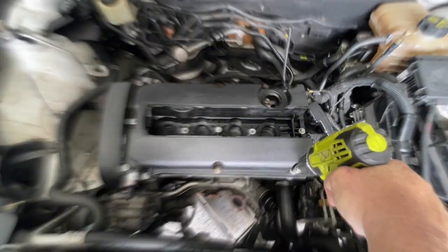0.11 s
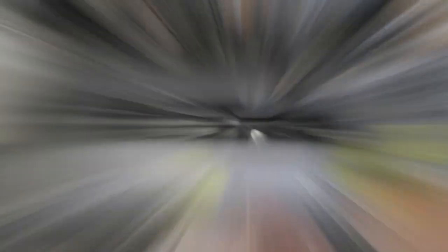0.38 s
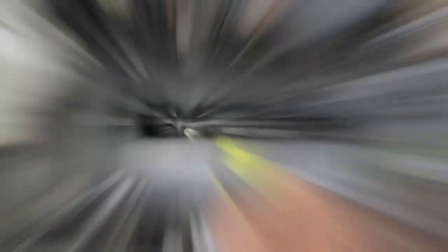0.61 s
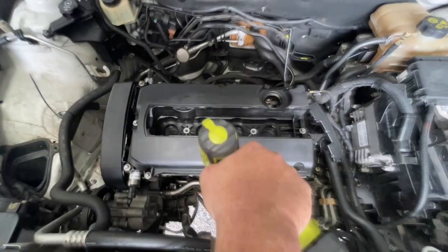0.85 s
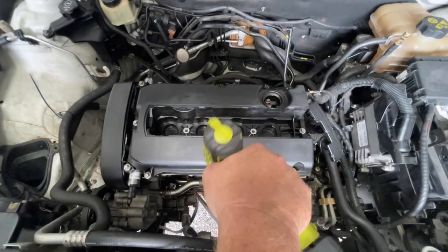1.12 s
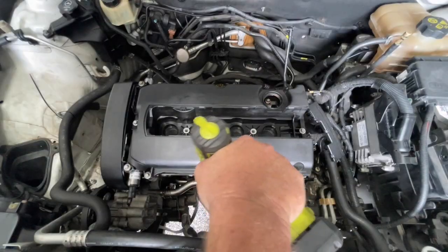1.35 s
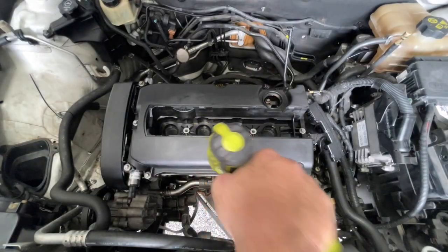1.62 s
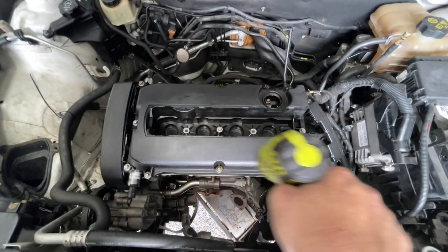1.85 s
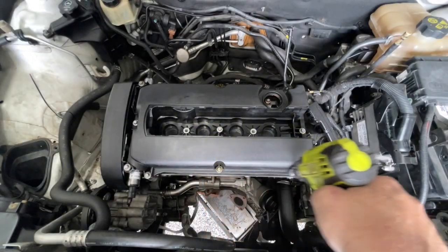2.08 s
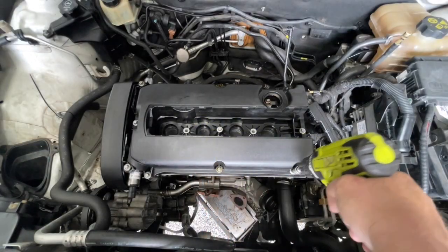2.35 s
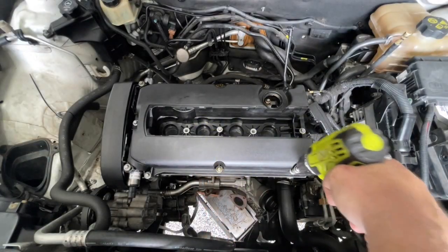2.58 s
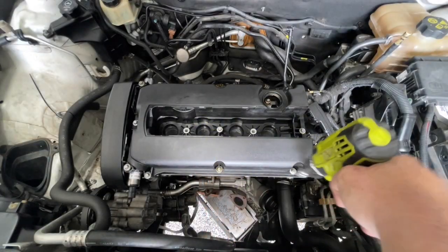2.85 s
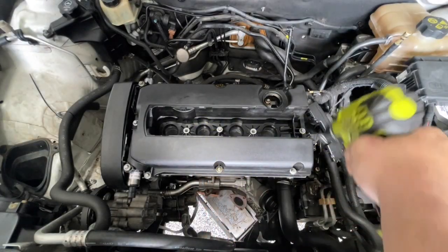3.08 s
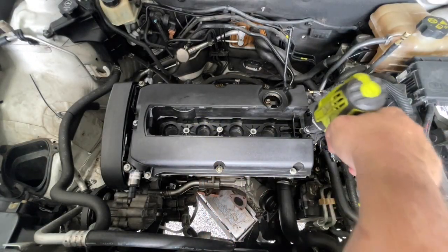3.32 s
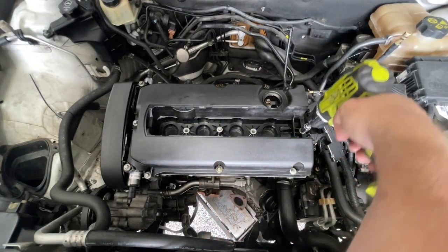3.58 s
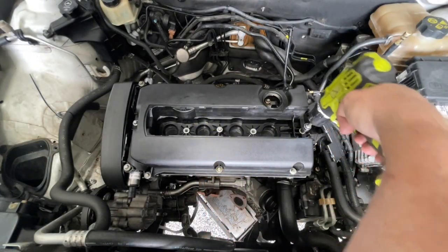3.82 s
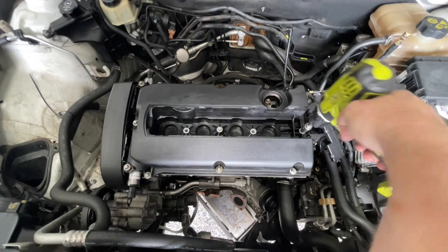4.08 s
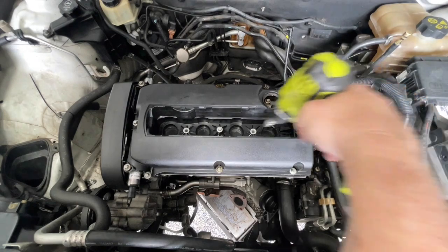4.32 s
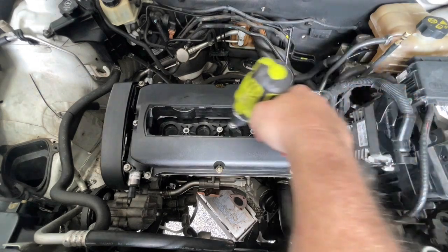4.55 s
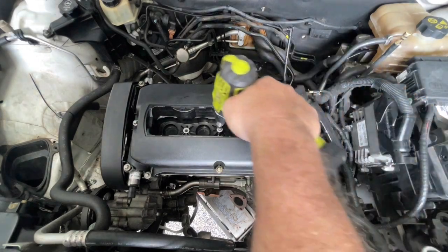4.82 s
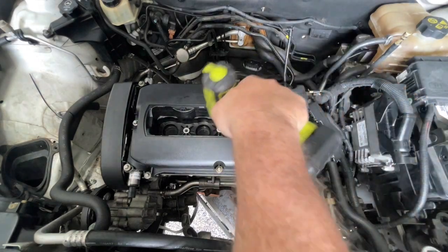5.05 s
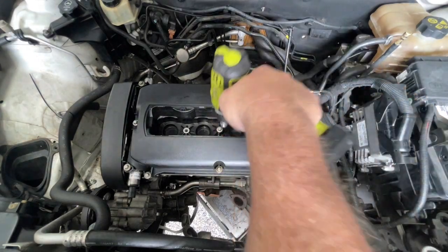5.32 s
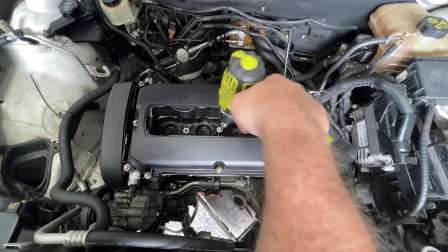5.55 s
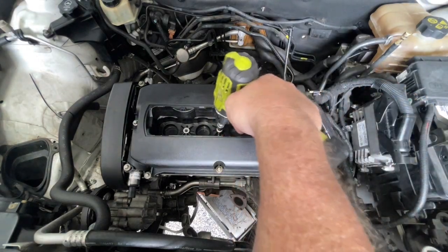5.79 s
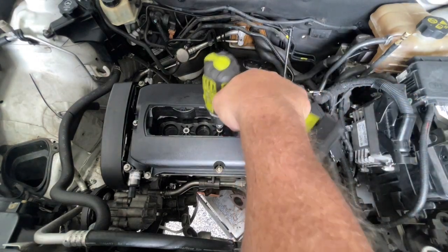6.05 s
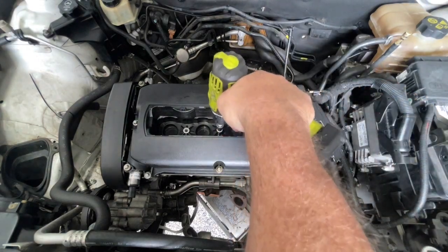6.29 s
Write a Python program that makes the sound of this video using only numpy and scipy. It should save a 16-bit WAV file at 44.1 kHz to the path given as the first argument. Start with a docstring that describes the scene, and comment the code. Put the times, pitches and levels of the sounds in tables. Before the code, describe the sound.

Close up in a large, reverberant workshop, a cordless impact driver already running winds down and stops. Four short trigger pulls follow, each a quick rising whine that bites into harsh, rapid hammering, ringing a hollow engine cover. In the gaps the socket ticks on bolt heads and the tool knocks the cover. A low rumble continues beneath, in stereo.

```python
"""A whining, whirring motor slows to a stop: a cordless impact driver in a large workshop.
Four more pulls of the trigger run bolts down on an engine cover. The whine is a stack of sine waves, the whir is noise.
Once a bolt bites, the hammer strikes about sixty times a second; each blow rings the cover's modes.
Between runs the socket clicks on bolt heads and the tool knocks on the cover: noise bursts and ringing modes.
Close echoes and a ringing hall surround the tool, over a low rumble of coloured noise."""
import sys
import numpy as np
from scipy import signal
from scipy.fft import rfft, irfft, next_fast_len
from scipy.io import wavfile

SR = 44100
rng = np.random.default_rng(int(sys.argv[2]) if len(sys.argv) > 2 else 0)


def to_wav(s):
    """Save 16-bit WAV."""
    ch = np.atleast_2d(s).T  # columns
    pcm = np.round(np.clip(ch, -1, 1) * 32767)  # PCM
    wavfile.write(sys.argv[1], SR, pcm.astype(np.int16))


def invert_db(x):
    """Field ratio 10**(x/20) for x, a level in decibels (scalar or array-like)."""
    u = np.asarray(x, float) / 20
    return 10 ** u


N = 283122   # length in samples
TIME_S = np.arange(N) / SR
HZ = np.arange(N // 2 + 1) * SR / N + 1e-3   # pitch of each spectrum bin, kept above zero for the logarithm

# A run already under way slows to a stop: start_s, rotor_hz, whine_db, whir_db
RUN_DOWN = [(0, 306.2, -33, -27), (.48, 305.3, -40.5, -32.5), (.58, 273.7, -48.5, -35.5),
            (.67, 234, -56, -39.5), (.765, 199, -64.5, -49.5)]
# The hammer still slips while the tool coasts: start_s, blows_per_s, boom_db, favoured_hz, favour_db
SLIPPING = [(.592, 54, -38, 705, 2), (.76, 39, -49.5, 714, 6)]
# Pulls of the trigger: trigger_s, bite_s (the bolt bites), stop_s, whir_lost_under_load_db
PULLS = [(1.051, 1.179, 1.52, 1.5), (2.396, 2.448, 2.772, 4), (3.579, 3.692, 4.015, 1.5),
         (5.852, 5.992, 6.353, 1.5)]
# Free spin of each pull: top_rotor_hz, whine_db, once_a_turn_hum_lift_db
SPINS = [(270, -42, 9), (262, -50, 4), (252, -31, -10), (272, -38, 9)]
# Hammering pace of each pull: first_blows_per_s, full_blows_per_s, last_blows_per_s, flagging_start_s
PACES = [(59.5, 62.6, 45, 1.43), (55, 63.3, 46, 2.7), (58, 61, 51.5, 3.845), (59.3, 63, 45, 6.293)]
# Hammering bout of each pull: loudest_boom_db, loudest_point_share_of_bout, favoured_hz, favour_db
BOUTS = [(-21, 0.71, 840, 3.5), (-29.5, 0.15, 460, 8.5), (-27, 0.26, 520, 8), (-22, 0.69, 487, 10.5)]
# Whine of the motor: multiple_of_rotor_speed, level_db
WHINE_ORDERS = [(1, -7.5), (2, 1.5), (3, -4.5), (4, 1.5), (5, -8), (6, -10.5), (7.35, -12), (9, -7.5),
                (13, -11), (14, -13.5), (15, -9)]
# Noise colour of gears and fan: pitch_hz, level_db (dB per Hz)
WHIR_COLOUR = [(90, -41), (150, -16), (300, -2), (600, 0), (1200, 1.5), (2500, 0.5), (4000, -4.5),
               (6000, -3.5), (8000, -6)]
# Noise colour of the bright fan hiss and of hard ticks: pitch_hz, level_db (dB per Hz)
FAN_COLOUR = [(5000, -25.5), (8500, -7.5), (11500, -1.5), (15000, -7)]
# Noise colour of hammer on anvil: pitch_hz, level_db (dB per Hz)
CRACK_COLOUR = [(1000, -9.5), (3900, -5.5), (5300, 6.5), (7500, 1), (11000, 0)]
# Ringing modes of the cover: pitch_hz, level_db, decay_by_60_db_s
COVER_MODES = [(140.3, -15, 0.24), (187, -13, 0.062), (391.6, -3, 0.047), (431.7, -0.5, 0.064),
               (494, -3.5, 0.069), (596, -5, 0.098), (679, 0.5, 0.055), (797, -3.5, 0.041),
               (953, -0.5, 0.034), (1060, -2, 0.041), (1194, 1.5, 0.025), (1537, -5.5, 0.039),
               (1720, -7.5, 0.023), (2070, -2, 0.0083)]
# Socket and tool touching metal: start_s, tick_db, thud_db, favoured_thud_hz, bright_top_db
KNOCKS = [(0.5928, -12.5, -43, 880, -29), (0.823, -26, -32, 663, -63), (0.8338, -26.5, -33.5, 635, -62),
          (0.8685, -34.5, -42, 670, -71), (0.928, -26, -37, 524, -77), (1.0267, -30.5, -50, 586, -61),
          (1.0662, -8, -21.5, 804, -28), (1.5461, -31, -28.5, 694, -36), (1.586, -30.5, -36, 638, -52),
          (1.849, -45, -35.5, 640, -61), (1.8972, -58, -45, 718, -73), (2.1418, -18.5, -44, 974, -43),
          (2.147, -11, -37.5, 980, -25.5), (2.164, -29, -36, 421, -47), (2.363, -45, -50.5, 601, -59),
          (2.4154, -5.5, -24, 417, -16.5), (3.284, -9, -37.5, 594, -23), (3.3101, -28, -43, 669, -41),
          (3.3263, -19, -46.5, 711, -34), (3.3355, -13, -36.5, 523, -32), (3.3607, -42, -43.5, 668, -53),
          (3.5896, -19.5, -35.5, 610, -47), (4.2616, -37.5, -60, 1210, -45), (4.695, -23, -35, 487, -29),
          (4.837, -29.5, -46, 1240, -42), (4.898, -45, -50, 1000, -44), (4.9275, -7, -11.5, 790, -29),
          (4.966, -25.5, -36, 1020, -37), (4.9797, -20, -29, 685, -28), (5.0189, -32.5, -31.5, 920, -42),
          (5.2967, -24.5, -41.5, 1160, -21.5), (5.3165, -27.5, -30.5, 924, -26.5),
          (5.442, -24, -46, 1260, -44), (5.4695, -48, -47.5, 1060, -62), (5.625, -18.5, -29.5, 950, -36.5),
          (5.6602, -26.5, -35.5, 494, -47), (5.685, -34.5, -47.5, 968, -41.5),
          (5.8721, -36, -28.5, 633, -43)]
# The switch closing at each pull: tick_db, thud_db, favoured_thud_hz, bright_top_db
TRIGGER_CLICK = (-27, -47, 895, -34)
# Noise colour of steel on steel: pitch_hz, level_db (dB per Hz)
TICK_COLOUR = [(600, -23.5), (1000, -8), (2150, 1.5), (3000, 4.5), (4500, -1.5), (6000, -2), (8000, -12)]
# What the close echoes of the engine bay pick up: pitch_hz, level_db
BAY_COLOUR = [(200, -20), (500, -6), (1500, -4), (5000, -2.5), (9000, -5)]
# Ring of the hall: pitch_hz, decay_by_60_db_s
HALL_DECAY = [(100, 0.66), (500, 0.8), (2000, 1), (6000, 1.08), (12000, 0.24)]
# Noise colour of the rumble: pitch_hz, level_db (dB per Hz)
RUMBLE_COLOUR = [(25, -44), (40, -14.5), (55, -4), (80, -7), (157, -15.5), (300, -22), (1030, -25.5),
                 (2500, -41), (8000, -55), (11500, -47)]
# Overall tone, lifted around 10 kHz and falling away above 12 kHz: pitch_hz, level_db
OVERALL_TONE = [(25, -23.5), (45, -2), (7500, -0.5), (8600, 3), (9600, 7), (11200, 7), (12000, -1.5),
                (12900, -13), (15600, -14), (16200, -63)]
# How much stronger the tilt makes left than right: pitch_hz, level_db
LEFT_OVER_RIGHT = [(200, 0), (800, -0.1), (2000, 1), (3500, 4), (7000, 4.5), (8400, -0.4)]
# How far the right channel is turned ahead in phase: pitch_hz, half_turns
RIGHT_TURN = [(1500, 0), (3000, -.25), (7600, -.2), (8800, 0), (9800, .92), (10400, 1.03), (11800, 2),
              (12700, 2), (13100, 3), (14400, 3), (14800, 4)]

# Rotor: starts at a share of its top speed, climbs, then settles under load
START_SHARE, CLIMB_S, LOADED_HZ, SETTLE_S = .84, .105, 295.3, .07
SPIN_UP_S, BITE_S = .05, .004   # rise of the whir at the trigger and at the bite
WHINE_START_DB, WHINE_LOADED_DB = -18, -9   # added to the whine of the free spin
FLUTTER_DB = 2   # spread of each whine order's own wavering
HOUSING_HZ, HOUSING_WIDTH_HZ, HOUSING_DB = 2000, 60, 22   # the tool's shell sings as an order passes
WHIR_START_DB, WHIR_FREE_DB, WHIR_DB = -38, -27.5, -23   # at the trigger, spinning free, just after the bite
SQUEEZE_S, SQUEEZE_DB = .031, -48   # the gears rustle as the finger takes up the trigger
LET_GO_S, LET_GO_DB, BRAKE_S, BRAKE_DB = .063, -3.5, .018, -29.5   # the trigger eases off, the brake grips
FAN_DB, FAN_RUN_DOWN_DB = -5, 0   # fan hiss against the whir: in the pulls, in the run-down
GATHER_S, FLAG_S = .16, .04   # the pace gathers after the bite and flags as the bolt tightens
BOOM_RISE_DB, BOOM_FALL_DB = 5, 6   # swell and fall of a bout
SHUDDER_S, SHUDDER_DB = .036, -21.5   # its dying shudder
FIRST_BLOW_DB, SLIP_SHAKE_DB = 1, 5   # extra shake from first blows and from slipping blows
CRACK_DB = 3   # steel crack of a blow against the whir
TICK_CREST_DB = 8   # a tick's peak stands above the rms of its grit
JOLT_DB, JOLT_HZ = -55.5, 143   # the tool kicks as it spins up and as it brakes
RUMBLE_DB = -47.5


def rms_one(x):
    """Scale to unit rms."""
    return x / np.sqrt(np.mean(x ** 2) + 1e-20)


def at_hz(points, hz):
    """Read a table of pitches and values on a log-frequency axis."""
    point_hz, value = np.array(points).T
    return np.interp(np.log(hz), np.log(point_hz), value)


def colour(x, spectrum):
    """Filter a sound by a table of pitches and levels."""
    return irfft(rfft(x) * invert_db(at_hz(spectrum, HZ)), N)


def in_time(tables, fade_s):
    """Return a gate that is open inside each table's time span, then every column as a curve."""
    gate = 0
    for rows in tables:
        start, end = rows[0][0], rows[-1][0]
        gate = gate + np.interp(TIME_S, [start - fade_s, start, end, end + fade_s], [0, 1, 1, 0])
    s, *columns = np.concatenate(tables).T
    return [gate] + [np.interp(TIME_S, s, column) for column in columns]


def drift(rate):
    """Slow random curve with a spread of about 1, drawn through this many points per second."""
    knots = rng.standard_normal(int(N / SR * rate) + 2)
    return np.interp(TIME_S * rate, np.arange(len(knots)), knots) * 1.2


def dying(clicks, tau_s):
    """Each click starts an exponential decay."""
    return signal.lfilter([1], [1, -np.exp(-1 / (tau_s * SR))], clicks + 1e-18)


def runs():
    """Each pull spins up, spins free, bites, labours, eases off and brakes."""
    tables = [np.c_[RUN_DOWN, np.zeros(len(RUN_DOWN))]]
    for (trigger, bite, stop, lost_db), (top_hz, whine_db, hum_db) in zip(PULLS, SPINS):
        let_go, brake = stop - LET_GO_S, stop - BRAKE_S
        s = np.sort([trigger, trigger + SPIN_UP_S, trigger + 2 * SPIN_UP_S, bite, bite + BITE_S,
                     bite + SETTLE_S, let_go, brake, stop])
        load = np.clip((s - bite) / SETTLE_S, 0, 1)
        free_hz = top_hz * np.interp(s - trigger, [0, CLIMB_S], [START_SHARE, 1])
        rotor_hz = free_hz + load * (LOADED_HZ - free_hz)
        still_starting = np.clip(1 - (s - trigger) / (2 * SPIN_UP_S), 0, 1)
        whine = whine_db + WHINE_START_DB * still_starting + WHINE_LOADED_DB * load
        tired_db = WHIR_DB - lost_db
        eased_db = tired_db + LET_GO_DB
        spun_up = min(trigger + SPIN_UP_S, bite - BITE_S)
        whir = np.interp(s, [trigger, spun_up, bite, bite + BITE_S, let_go, brake, stop],
                         [WHIR_START_DB, WHIR_FREE_DB, WHIR_FREE_DB, WHIR_DB,
                          tired_db, eased_db, eased_db + BRAKE_DB])
        # the rustle before the trigger has practically no whine
        squeeze = [(trigger - early_s, START_SHARE * top_hz, -99, SQUEEZE_DB, hum_db)
                   for early_s in (SQUEEZE_S, .001)]
        pull = np.transpose([s, rotor_hz, whine, whir, hum_db + 0 * s])
        tables.append(np.r_[squeeze, pull])
    return tables


def housing(hz):
    """Lift in dB near the resonance of the tool's shell."""
    return HOUSING_DB * np.exp(-((hz - HOUSING_HZ) / HOUSING_WIDTH_HZ) ** 2)


def motor(shake):
    """Unsteady whine at multiples of rotor speed; noise throbs once a turn and at blows, which also crack."""
    on, rotor_hz, whine_db, whir_db, hum_db = in_time(runs(), fade_s=.004)
    phase = 2 * np.pi * np.cumsum(rotor_hz * (1 + .0012 * drift(60))) / SR
    whine = np.zeros(N)
    for order, db in WHINE_ORDERS:
        level_db = db + FLUTTER_DB * drift(45) + hum_db * (order == 1) + housing(order * rotor_hz)
        whine += invert_db(level_db) * np.sin(order * phase + rng.uniform(0, 2 * np.pi))
    once_a_turn = 1 + 0.24 * np.cos(phase)
    throb = once_a_turn * invert_db(0.29 * drift(220)) * (1 + 1.29 * shake)
    whir = rms_one(colour(rng.standard_normal(N), WHIR_COLOUR)) * throb
    grit = rng.choice([-1, 1], N)   # grains of equal size keep the cracks alike
    crack = invert_db(CRACK_DB) * shake * rms_one(colour(grit, CRACK_COLOUR))
    fan_db = np.where(TIME_S < RUN_DOWN[-1][0], FAN_RUN_DOWN_DB, FAN_DB)
    fan = invert_db(fan_db) * rms_one(colour(rng.standard_normal(N), FAN_COLOUR)) * throb
    return on * (invert_db(whine_db) * whine + invert_db(whir_db) * (whir + fan + crack))


def bouts():
    """Each bout gathers pace, swells to its loudest, flags until the brake grips and shudders out."""
    tables = [SLIPPING]
    for (_, bite, stop, _), (first, full, last, flags), (boom_db, share, hz, favour_db) in zip(
            PULLS, PACES, BOUTS):
        end = stop - BRAKE_S
        loudest = bite + share * (end - bite)
        gathered, flagged, silent = bite + GATHER_S, flags + FLAG_S, end + SHUDDER_S
        s = np.sort([bite, gathered, loudest, flags, flagged, end, silent])
        pace = np.interp(s, [bite, gathered, flags, flagged], [first, full, full, last])
        boom = boom_db + np.interp(s, [bite, loudest, end, silent],
                                   [-BOOM_RISE_DB, 0, -BOOM_FALL_DB, SHUDDER_DB - BOOM_FALL_DB])
        tables.append(np.transpose([s, pace, boom, hz + 0 * s, favour_db + 0 * s]))
    return tables


def cover(at, blow_db, boom_hz, favour_db, spread_db):
    """Blows ring every mode of the cover with random strengths; modes near boom_hz are favoured."""
    out = np.zeros(N)
    chance = rng.standard_normal((len(at), len(COVER_MODES)))
    for k, (hz, level_db, t60) in enumerate(COVER_MODES):
        near = np.exp(-(np.log2(hz / boom_hz) / 0.32) ** 2)
        strength_db = blow_db + level_db + favour_db * near + spread_db * chance[:, k]
        clicks = np.zeros(N)
        np.add.at(clicks, at, invert_db(strength_db))
        # a two-pole resonator: r sets the decay, w the pitch
        r, w = invert_db(-60 / (t60 * SR)), 2 * np.pi * hz / SR
        ring = signal.lfilter([0, np.sin(w)], [1, -2 * r * np.cos(w), r * r], clicks + 1e-18)
        out += (-1) ** k * ring
    return out


def hammer():
    """Nearly regular blows boom in the cover; also returns the shake that each blow gives the gears."""
    gate, per_s, boom_db, boom_hz, favour_db = in_time(bouts(), fade_s=.001)
    turns = np.cumsum(gate * per_s * (1 + .006 * drift(40))) / SR
    # the count restarts just short of one, so each bout opens with a blow
    turns = turns - np.maximum.accumulate(turns * (gate == 0)) + .97
    at = np.flatnonzero(np.diff(np.floor(turns)) > 0)
    # the hammer clacks back about halfway between blows
    rebound = np.flatnonzero(np.diff(np.floor(turns + .5 + .03 * drift(50))) > 0)
    blows = np.zeros(N)
    first = np.diff(at, prepend=-SR) > SR / 10
    blows[at] = invert_db(.7 * rng.standard_normal(N)[at] + FIRST_BLOW_DB * first)
    blows[rebound] = .4 * invert_db(1.2 * rng.standard_normal(N)[rebound])
    blows[:round(SLIPPING[-1][0] * SR)] *= invert_db(SLIP_SHAKE_DB)
    boom = cover(at, boom_db[at], boom_hz[at], favour_db=favour_db[at], spread_db=1.4)
    boom += cover(rebound, boom_db[rebound] - 6.0, 2 * boom_hz[rebound], favour_db=3.5, spread_db=3.0)
    shake = 2.2 * (dying(blows, tau_s=.0018) - dying(blows, tau_s=.0005))
    return boom, shake


def knocks():
    """Each touch rattles: a blow and two bounces into the cover, and a burst of steel ticks."""
    touches = KNOCKS + [(pull[0], *TRIGGER_CLICK) for pull in PULLS]
    s, tick_db, thud_db, thud_hz, bright_db = np.array(touches).T
    touch_at = np.round(s * SR).astype(int)
    late_s = rng.uniform(0.663, 1.312, (len(s), 3)) * [0, .003, .008]   # blow, first and second bounce
    at = np.round((s[:, None] + late_s) * SR).astype(int).ravel()
    blow_db = (thud_db[:, None] - [3.0, 4.0, 10.0]).ravel()
    thuds = cover(at, blow_db, np.repeat(thud_hz, late_s.shape[1]), favour_db=5.0, spread_db=3.0)
    starts = np.zeros(N)
    starts[touch_at] = invert_db(tick_db - TICK_CREST_DB)
    # swells within a millisecond or two
    burst = dying(starts, tau_s=0.007) - dying(starts, tau_s=0.00096)
    grit = rng.standard_normal(N) * invert_db(1.5 * drift(1500))   # uneven grains
    hard = np.zeros(N)
    hard[touch_at] = invert_db(bright_db)
    sheen = dying(hard, tau_s=0.005) * rms_one(colour(grit, FAN_COLOUR))
    kick_s = np.array([(trigger + SPIN_UP_S, stop - BRAKE_S) for trigger, _, stop, _ in PULLS]).ravel()
    kicks = np.round(kick_s * SR).astype(int)
    jolts = cover(kicks, JOLT_DB, JOLT_HZ, favour_db=32.5, spread_db=-2)
    return thuds + jolts + burst * rms_one(colour(grit, TICK_COLOUR)) + sheen


def bay(x, t60_s):
    """Close echoes change as hand and tool move: the sound wanders among eight short stereo responses."""
    t = np.arange(round(2 * t60_s * SR)) / SR
    tails = rng.standard_normal((8, 2, len(t))) * invert_db(-60 * t / t60_s)
    tails = tails / np.sqrt(np.sum(tails ** 2, axis=2, keepdims=True))
    shares = np.array([drift(35) for tail in tails])
    shares = shares / np.sqrt(np.sum(shares ** 2, axis=0))   # the total power of the shares stays even
    return sum(signal.fftconvolve([x * share], tail, axes=1)[:, :N] for share, tail in zip(shares, tails))


def echoes(x, t60, level_db, gap_s):
    """The hall answers like stereo noise that dies away at its own rate in each octave."""
    t = np.arange(2 * SR) / SR
    size = next_fast_len(N + 2 * SR)
    hz = np.arange(SR + 1) / 2 + 0.00083
    white = rfft(rng.standard_normal((2, 2 * SR)))
    tail = 0
    for centre_hz in 62.5 * 2. ** np.arange(10):
        overlap = np.clip(1 - abs(np.log2(hz / centre_hz)), 0, 1)   # overlapping octaves
        tail = tail + irfft(white * overlap) * invert_db(-60 * t / at_hz(t60, centre_hz))
    tail = tail * np.clip(t / gap_s, 0, 1)
    tail = tail / np.sqrt(np.sum(tail ** 2, axis=1, keepdims=True))
    return invert_db(level_db) * irfft(rfft(x, size) * rfft(tail, size), size)[:, :N]


def rumble():
    """Far traffic and ventilation as noise: alike in both channels in the bass, nearly unrelated above."""
    mid, side = rfft(rng.standard_normal((2, N)))
    alike = at_hz([(60, 1.0), (200, 0.89), (600, 0.07)], HZ).clip(0, 1)
    pair = np.sqrt(1 + alike) * mid + np.sqrt(1 - alike) * side * [[1], [-1]]
    return invert_db(RUMBLE_DB) * rms_one(irfft(pair * invert_db(at_hz(RUMBLE_COLOUR, HZ)), N))


def scene():
    """Tool and cover, the close echoes of the engine bay, the hall and its rumble."""
    boom, shake = hammer()
    near = boom + motor(shake) + knocks()
    close = bay(colour(near, BAY_COLOUR), t60_s=.011)
    hall = echoes(near, HALL_DECAY, level_db=-17.0, gap_s=0.0025)
    return near + close + hall + rumble()


def top_cut(x):
    """Nothing passes above the cut-off."""
    return signal.sosfilt(signal.butter(12, 17060, fs=SR, output="sos"), x)


def record(dry):
    """The overall tone is shaped; the treble is made nearly mono and its right side turned in phase."""
    left, right = rfft(dry) * invert_db(at_hz(OVERALL_TONE, HZ))
    mono = np.clip((HZ - 7300) / 1400, 0, .75)   # share of the left channel mixed into the right
    right = (1 - mono) * right + mono * left
    tilt = invert_db(at_hz(LEFT_OVER_RIGHT, HZ) / 2)   # half the difference goes to each side
    turn = np.exp(1j * np.pi * np.interp(HZ, *np.transpose(RIGHT_TURN)))
    mix = irfft([left * tilt, right / tilt * turn], N)
    return top_cut(mix)


dry = scene()
out = record(dry)
to_wav(out)
```